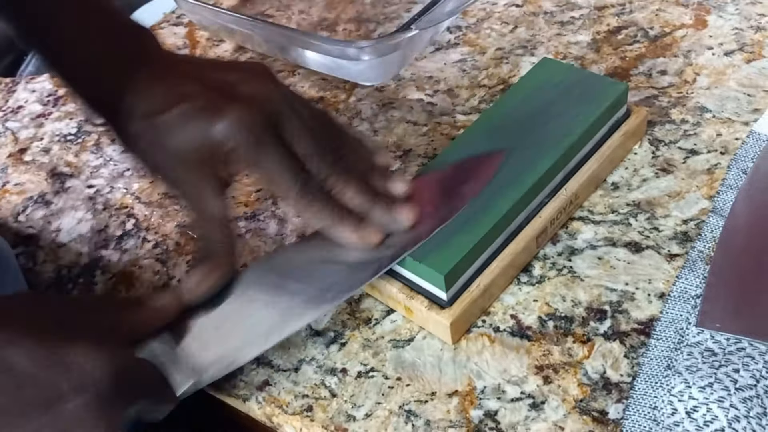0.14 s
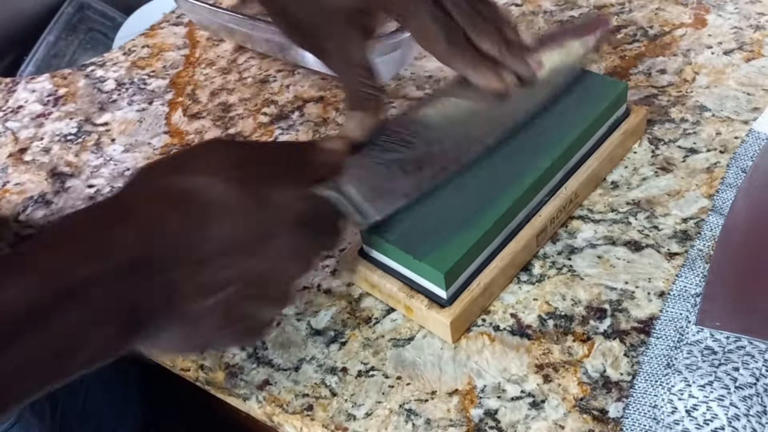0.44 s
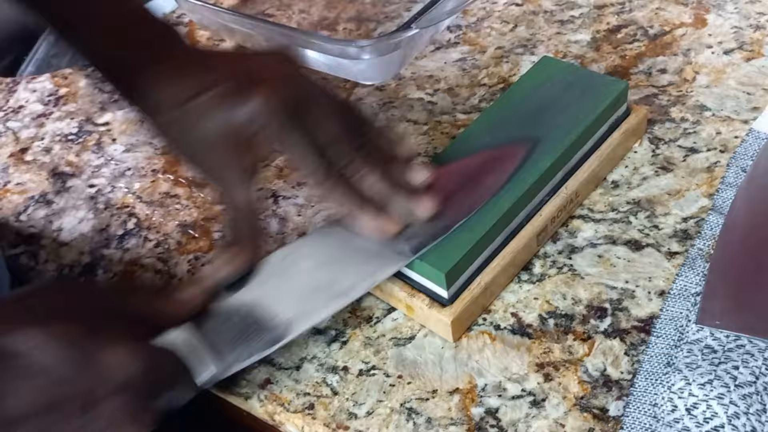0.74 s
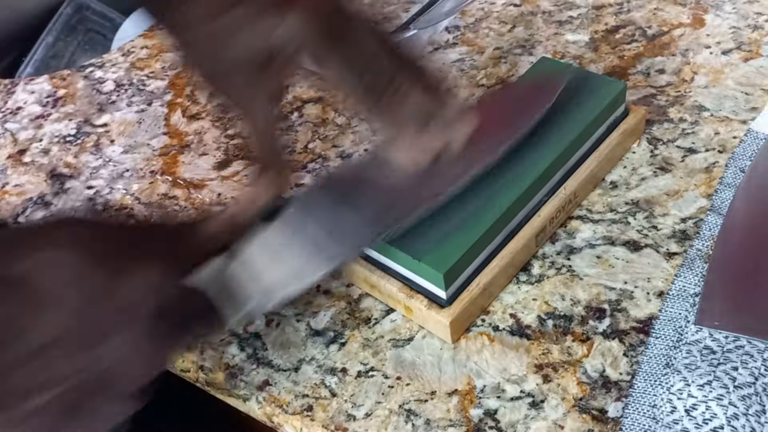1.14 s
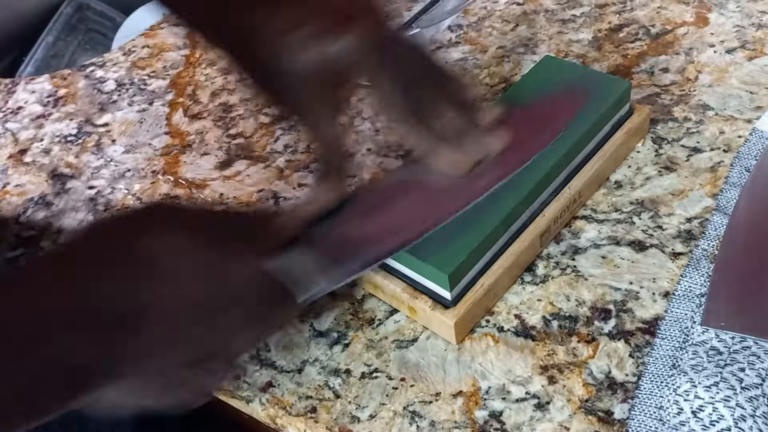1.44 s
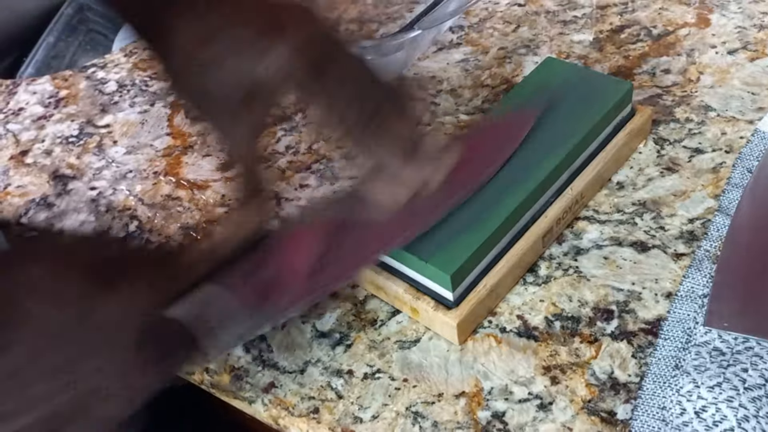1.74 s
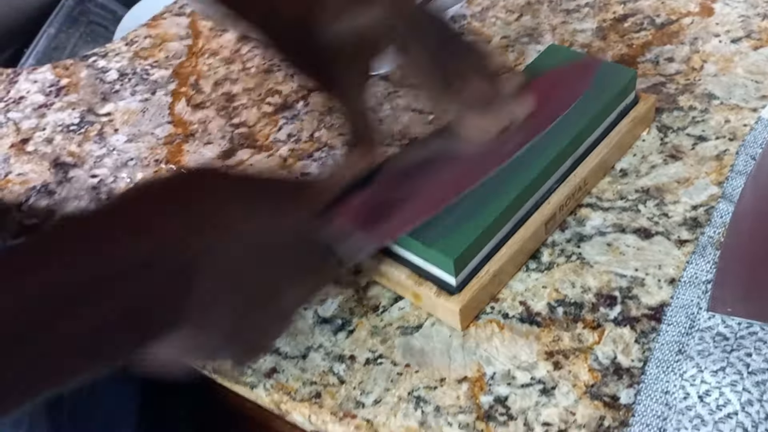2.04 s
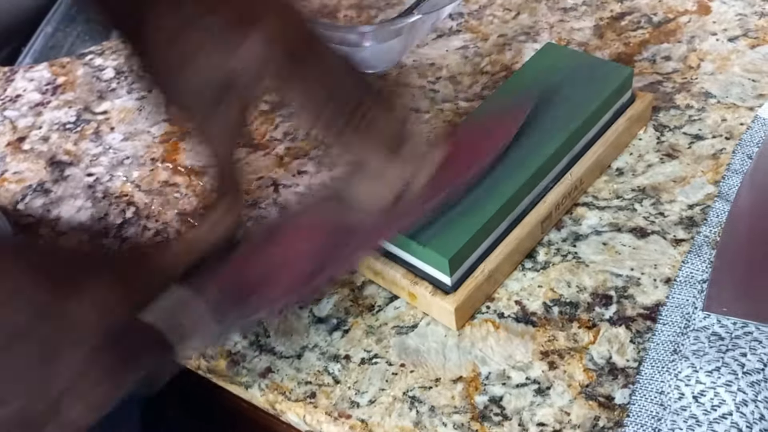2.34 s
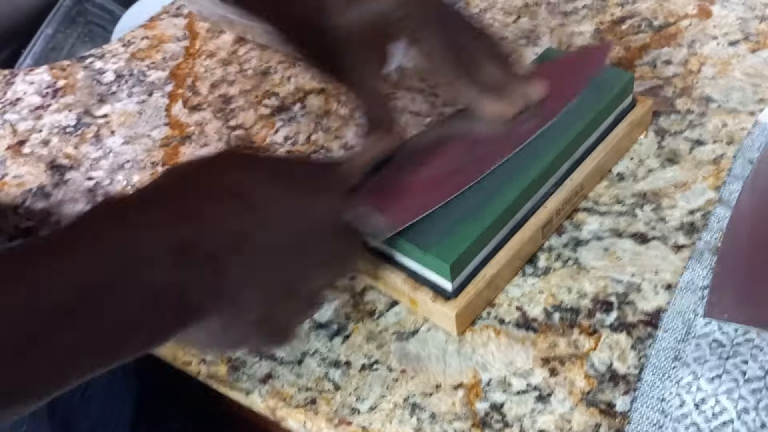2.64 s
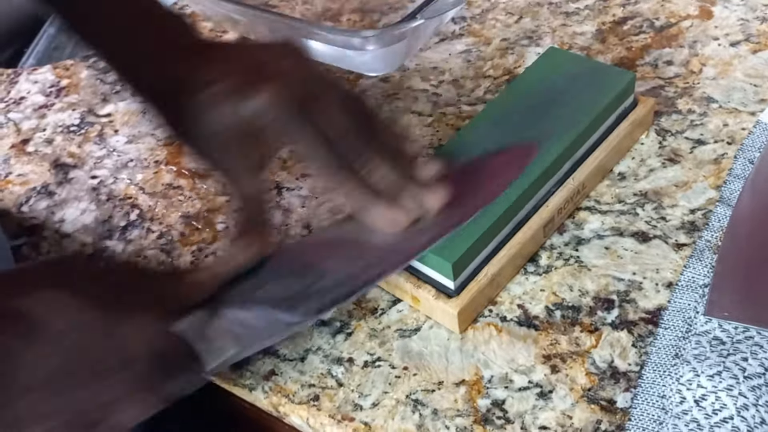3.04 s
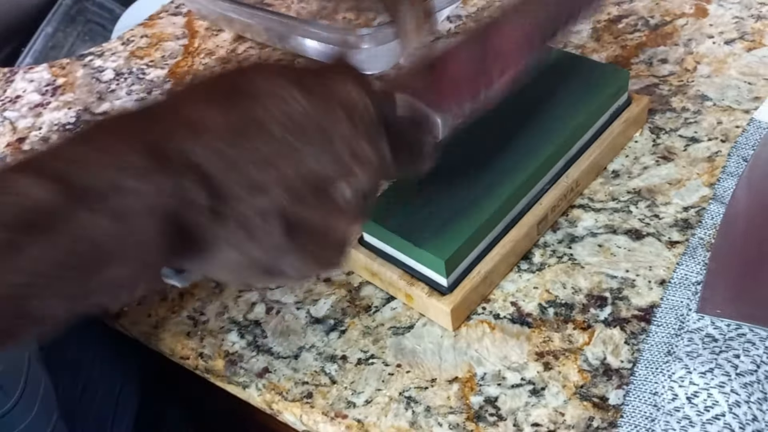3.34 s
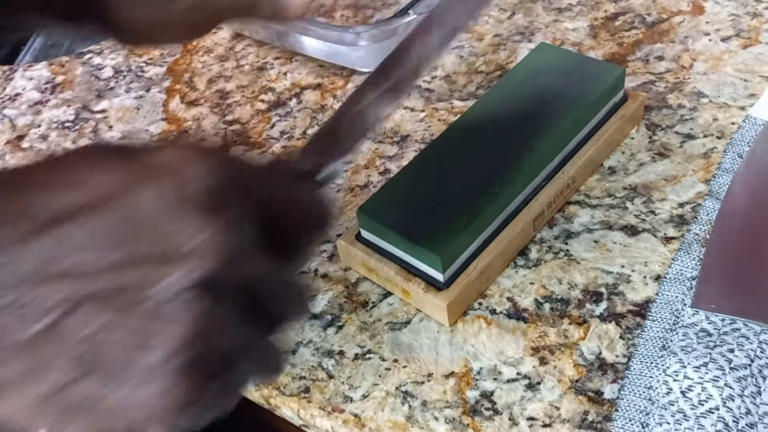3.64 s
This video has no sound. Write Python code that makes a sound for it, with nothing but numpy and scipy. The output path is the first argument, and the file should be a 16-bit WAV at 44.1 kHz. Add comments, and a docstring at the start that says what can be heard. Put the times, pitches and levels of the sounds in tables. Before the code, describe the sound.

Six brisk knife strokes on a sharpening stone, clinking at contact and scraping brightly, with small chirps in the fourth and fifth and faint blade ringing after later ones, recorded close in a kitchen.

```python
"""A kitchen knife is drawn six times along a whetstone over a low appliance drone and a faint hiss.
Each stroke starts with a clink, blade modes and a noise crack; then random grains scrape the edge, driving hiss,
blade body and a sliding resonance. Chirping tones mark catches of the edge in strokes four and five.
At the end of strokes the edge may rasp as it slips off and ring free as decaying sines.
A small hard kitchen answers every knife sound with a short noise tail."""
import sys
import numpy as np
from scipy import signal
from scipy.fft import rfft, irfft, next_fast_len
from scipy.io import wavfile
from scipy.ndimage import uniform_filter1d, map_coordinates

SR = 44100
rng = np.random.default_rng(int(sys.argv[2]) if len(sys.argv) > 2 else 0)


def to_wav(sig):
    """Store sig (one row per channel, or 1-D mono) as 16-bit WAV at the path in sys.argv[1].

    Samples outside -1..1 are clipped; the rate is SR.
    """
    pcm = np.clip(np.atleast_2d(sig), -1, 1) * 32767
    pcm = np.round(pcm).astype(np.int16)
    wavfile.write(sys.argv[1], SR, pcm.T)  # frames by channels


def convert_level_to_amplitude(level_db):
    """Map a level in decibels to its linear amplitude factor."""
    exponent = np.asarray(level_db, float) / 20
    return 10 ** exponent


N = 167580
T = np.arange(N) / SR

# grit hiss, one list a stroke: t/s, level/dB
STROKES = [
    [(.105, -39), (.17, -41), (.345, -28.5), (.42, -33.5), (.45, -37.5)],
    [(.69, -48.5), (.83, -40.5), (.96, -27.5), (1.01, -31.5), (1.06, -47.5)],
    [(1.26, -36.5), (1.32, -41.5), (1.53, -27.5), (1.63, -46.5)],
    [(1.795, -38), (1.878, -44), (1.93, -31.5), (1.995, -30.5), (2.12, -31.5), (2.2, -50)],
    [(2.4, -42.5), (2.465, -47.5), (2.53, -29.5), (2.6, -32), (2.67, -26), (2.76, -53.5)],
    [(2.985, -48.5), (3.03, -43), (3.1, -29), (3.24, -27.5), (3.33, -49.5)],
]
# blade lands: t/s, relative level/dB, contact (0 near the tip, 1 mid blade)
LANDINGS = [(.102, -14.5, 0), (.684, -13.5, 0), (1.254, -19, 0), (1.79, -23, 1), (2.397, -18.5, 1),
            (2.978, -17.5, 1)]
# modes of the held blade on the stone: f/Hz, relative level near the tip/dB, mid blade/dB
BLADE = [(404.4, -31, -16), (780, -11.5, -19), (1068, -13.5, -55.5), (1269, -33.5, -9.5),
         (1380, -6.5, -26.5), (1583, -6, -29), (1794, -28.5, -4), (2039, -2, -22.5), (3081, -28.5, -3),
         (3766, 3, -2.5), (4190, 2, -3), (4600, 4.5, -3.5), (5040, -3, -14), (6085, -14.5, -19)]

BODY_WIDTH_HZ = 320
CONTACT_S = 0.00066  # time constant of a blow's onset
DETUNE = [0.016, 0.003]  # relative pitch spread: near the tip, mid blade
CHIRP_S, CHIRP_SAG = 0.011, 0.05  # time scale; share of pitch lost per time scale


def unit(x):
    """Scale to an rms of 1."""
    return x / np.sqrt(np.mean(x ** 2) + 1e-20)


def along(points, hz):
    """Interpolate (f/Hz, value) points on a log frequency axis."""
    f, v = np.transpose(points)
    return np.interp(np.log(hz + 1), np.log(f + 1), v)


def wobble(knots_per_s):
    """Smooth random curve through normally distributed knots."""
    knots = rng.standard_normal(int(N * knots_per_s / SR) + 4)
    return map_coordinates(knots, [T * knots_per_s])


def filtered(x, response):
    """Multiply the spectrum by a complex response of frequency."""
    m = next_fast_len(N + SR // 2)
    return irfft(rfft(x, m) * response(np.fft.rfftfreq(m, 1 / SR)), m)[..., :N]


def rings(rows):
    """Response of causal resonances, rows of f/Hz, width/Hz, level/dB; signs alternate."""
    def response(f):
        return sum((-1) ** k * convert_level_to_amplitude(db) * 1j * f * width / (c * c - f * f + 1j * f * width)
                   for k, (c, width, db) in enumerate(rows))
    return response


def spread(x, other):
    """Two ports: a shared sound plus and minus an unrelated share."""
    # side over mid in noises: f/Hz, amplitude ratio
    unlike = [(200, 0.19), (5000, 1)]
    side = filtered(other, lambda hz: np.clip(along(unlike, hz), 0, 1))
    return np.array([x + side, x - side])


def add(x, s, sound):
    """Mix a short sound in at s seconds, cut at the end."""
    part = x[:, round(s * SR):][:, :sound.shape[-1]]
    part += sound[..., :part.shape[1]]


def scrape():
    """Grit drives the hiss, the blade body, its low modes and the sliding resonance; the edge catches."""
    # slope of the hiss: f/Hz, relative level/dB
    hiss_slope = [(3000, -40.5), (5000, -8.5), (9000, -9.5), (12300, -0.5), (16000, -6.5)]
    # peak added to the slope: f/Hz, width/Hz, level against the slope/dB
    hiss_rings = [(7460, 330, 3)]
    # a row a stroke: blade body over hiss/dB, low modes over hiss at the stroke's top/dB
    grip = [(-14.5, -24), (-16, -26.5), (-12, -31), (-13.5, -29.5), (-14, -29.5), (-12.5, -34)]
    slide_db = [-16, -10]  # over the hiss: near the tip, mid blade
    low_follows = 0.31  # dB the low modes fall per dB of hiss, over the hiss's first 20 dB

    low = [(hz, BODY_WIDTH_HZ / 2, max(tip, mid)) for hz, tip, mid in BLADE[1:8]]
    high = [(hz, BODY_WIDTH_HZ, mid / 2) for hz, tip, mid in BLADE[7:]]
    hiss = filtered(grit(), lambda f: convert_level_to_amplitude(along(hiss_slope, f)) * (1 + np.abs(rings(hiss_rings)(f))))
    layers = [hiss, filtered(grit(), rings(high)), filtered(grit(), rings(low)), grit(sliding)]

    gains = np.zeros((4, N))
    for rows, (body_db, low_db), (*_, place) in zip(STROKES, grip, LANDINGS):
        db = stroke_db(rows)
        top = np.max(np.array(rows)[:, 1])
        low_db = low_db - (1 - low_follows) * np.maximum(db - top, -20)
        gains += convert_level_to_amplitude(np.array([db, db + body_db, db + low_db, db + slide_db[place]]))
    mix = sum(g * spread(*unit(x)) for g, x in zip(gains, layers))
    flutter = convert_level_to_amplitude(0.77 * wobble(40))
    return flutter * mix + spread(catches(gains[0]), catches(gains[0]))


def stroke_db(rows):
    """Hiss level of one stroke in dB, with short ramps at its ends and -300 outside."""
    s, db = np.transpose(rows)
    return np.interp(T, [s[0] - .004, *s, s[-1] + .03], [-99, *db, -99], -300, -300)


def grit(shape=lambda hz, s: 1):
    """Dense abrasive grains of random size and sign, with drifting patches of colour."""
    grains_per_s, patchy_db = 9000, 4.5
    hits = rng.random((2, N)) < grains_per_s / SR
    hz, s, z = signal.stft(hits * rng.standard_normal((2, N)), SR, nperseg=256)
    field = uniform_filter1d(rng.standard_normal(z.shape[1:]), size=2, axis=0)
    field = uniform_filter1d(field, size=9, axis=1)
    z = z * convert_level_to_amplitude(patchy_db * unit(field)) * shape(hz[:, None] + 1, s)
    return signal.istft(z, nperseg=256)[1][:, :N]


def sliding(hz, t):
    """Resonances as contact runs along the edge: tip strokes fall, mid-blade strokes fall and climb back."""
    # ridges that move together: frequency ratio to the centre
    ratios = [.66, 1, 1.65]
    from_hz, to_hz, width_octaves = 4700, [1520, 2960], 0.084  # to_hz: near the tip, mid blade
    centre = np.full(len(t), float(from_hz))
    for rows, (*_, place) in zip(STROKES, LANDINGS):
        s = np.transpose(rows)[0]
        if place:
            travel = np.sin(np.pi * np.clip((t - s[1]) / (s[-2] - s[1]), 0, 1))
        else:
            travel = np.clip((t - s[0]) / (s[-1] - s[0]), 0, 1) * (t < s[-1])
        centre = centre * (to_hz[place] / from_hz) ** travel
    ridges = sum(np.exp(-(np.log2(hz / centre / k) / width_octaves) ** 2) for k in ratios)
    return ridges / np.sqrt(centre)


def catches(level):
    """Small catches of the edge: short sagging whistles, random in time and pitch, scaled by the hiss level."""
    per_s, catch_db, centre_hz = 380, -19.5, 3870
    draw = rng.random((int(per_s * N / SR), 4))
    u = np.linspace(-1, 1, round(2 * CHIRP_S * SR))
    hz = centre_hz * 2 ** (2 * draw[:, 1:2] - 1)  # an octave either way
    envelope = np.exp(-(3 * u / (.5 + draw[:, 2:3])) ** 2)
    tone = envelope * np.sin(2 * np.pi * hz * np.cumsum(1 - CHIRP_SAG * u) / SR)
    at = (draw[:, :1] * N).astype(int) + np.arange(len(u))
    size = np.log(draw[:, 3:])  # exponentially distributed
    return convert_level_to_amplitude(catch_db) * level * np.bincount(at.ravel(), (size * tone).ravel(), N)[:N]


def struck(modes, t, detune):
    """Decaying modes (f/Hz, level/dB, t60/s); levels, pitches and phases vary by blow, phases by port too."""
    out = 0
    for hz, db, t60 in modes:
        phase = 2 * np.pi * rng.random() + 0.8 * rng.standard_normal((2, 1))
        decay = convert_level_to_amplitude(db + rng.normal() - 60 * t / t60)
        out = out + decay * np.sin(2 * np.pi * hz * rng.normal(1, detune) * t + phase)
    return out


def landings():
    """The blade lands: modes ring, noisy chatter strikes them again, and a broad noise crack dies away."""
    # pairs: near the tip, mid blade
    t60_1khz_s, t60_slope = [0.079, .13], [-1.19, -.25]  # slope: exponent of frequency
    chatter_t60_s, chatter_db = [0.072, 0.0197], [-6.5, -24]
    crack_db, crack_t60_s, crack_hz, clink_db = [5.5, 3.5], 0.059, 3550, -11

    x, t = np.zeros((2, N)), np.arange(SR // 2) / SR
    rise = 1 - np.exp(-t / CONTACT_S)
    for s, db, place in LANDINGS:
        modes = [(hz, (tip, mid)[place], t60_1khz_s[place] * (hz / 1000) ** t60_slope[place])
                 for hz, tip, mid in BLADE]
        ring = struck(modes, t, DETUNE[place])
        chatter = convert_level_to_amplitude(chatter_db[place] - 60 * t / chatter_t60_s[place]) * rng.standard_normal(len(t))
        again = signal.fftconvolve(ring * rise, chatter[None], axes=1)[:, :len(t)]
        ring = ring + again / np.sqrt(SR / 1000)
        noise = spread(*rng.standard_normal((2, N)))
        crack = unit(filtered(noise, rings([(crack_hz, 2 * crack_hz, 0)])))[:, :len(t)]
        crack = crack * convert_level_to_amplitude(-60 * t / crack_t60_s)
        add(x, s, convert_level_to_amplitude(db + clink_db) * rise * (ring + convert_level_to_amplitude(crack_db[place]) * crack))
    return x


def chirps():
    """The edge catches and chirps: sagging sines under a bell envelope of uneven level."""
    # t/s, f/Hz, level/dB
    caught = [(1.927, 4350, -30), (2.116, 4700, -31), (2.492, 4200, -32), (2.502, 3600, -32),
              (2.668, 5150, -26)]
    x = np.zeros((2, N))
    for s, hz, db in caught:
        u = (T - s) / CHIRP_S
        phase = 2 * np.pi * hz * np.cumsum(1 - CHIRP_SAG * np.clip(u, -2, 2)) / SR
        x += convert_level_to_amplitude(db + 2.2 * wobble(400)) * np.exp(-4 * u ** 2) * np.sin(phase)
    return x


def lift_offs():
    """The edge slips off: a burst of resonant grit, then the freed blade rings in decaying modes."""
    # t/s, rasp level/dB, free ring level/dB
    lifts = [(0.431, -38, -82), (1.012, -39.5, -64), (1.61, -63, -61), (2.18, -53, -43.5),
             (3.291, -55, -40)]
    # free blade: f/Hz, relative level/dB, t60/s
    free_modes = [(1545, -14, .25), (12020, 0, .2), (14300, -4, .25)]
    # rasp resonances: f/Hz, relative level/dB
    rasp_modes = [(880, -7), (1220, -7), (1550, -1.5), (2040, 2)]
    rasp_s = 0.0073  # half length, to 1/e

    x, t = np.zeros((2, N)), np.arange(SR // 2) / SR
    rise = 1 - np.exp(-t / CONTACT_S)
    rasp = unit(filtered(grit(), rings([(hz, BODY_WIDTH_HZ / 2, db) for hz, db in rasp_modes])))
    for s, rasp_db, db in lifts:
        x += convert_level_to_amplitude(rasp_db) * np.exp(-((T - s) / rasp_s) ** 2) * spread(*rasp)
        add(x, s, convert_level_to_amplitude(db) * rise * struck(free_modes, t, DETUNE[1]))
    return x


def kitchen(x):
    """Room answer: 120 samples late, a noise tail in which each frequency dies at its own speed."""
    # f/Hz, t60/s
    decay = [(3000, 0.36), (15000, 0.23)]
    hz, t, z = signal.stft(rng.standard_normal((2, SR // 2)), SR, nperseg=256)
    tail = signal.istft(z * convert_level_to_amplitude(-60 * t / along(decay, hz)[:, None]), SR, nperseg=256)[1]
    tail = tail / np.linalg.norm(tail[0])
    return signal.fftconvolve(np.pad(x, (120, 0))[None], tail, axes=1)[:, :N]


def background():
    """Low noise drone with narrow hums, swelling under the pressing hands, and a faint steady hiss."""
    # drone slope: f/Hz, relative level/dB
    drone_slope = [(25, -41.5), (100, -13), (250, -6), (480, -17), (1200, -44.5)]
    # hums added to the slope: f/Hz, width/Hz, level against the slope/dB
    hums = [(275.6, 2.2, 10.5), (423.3, 2.2, 15.5)]
    # faint hiss: f/Hz, relative level/dB
    air_slope = [(600, -24.5), (1700, -9.5), (3600, -17), (3830, 0), (4500, -11.5), (6000, -25),
                 (16000, -37.5)]
    drone_db, press_db, fade_db, air_db = -59, 6, -1.5, -77.5

    pressing = uniform_filter1d(sum(1. * (stroke_db(rows) > -60) for rows in STROKES), size=5000)
    fade = np.clip(T - 1.55, 0, 1)  # over 1 s from 1.55 s
    db = drone_db + press_db * pressing + fade_db * fade + wobble(6.7)
    drone = unit(filtered(rng.standard_normal((2, N)),
                          lambda f: convert_level_to_amplitude(along(drone_slope, f)) * (1 + np.abs(rings(hums)(f)))))
    air = unit(filtered(rng.standard_normal((2, N)), lambda f: convert_level_to_amplitude(along(air_slope, f))))
    return convert_level_to_amplitude(db) * spread(*drone) + convert_level_to_amplitude(air_db) * spread(*air)


def scene():
    """Knife with a level and time offset between the ports, its room answer, and the background."""
    # f/Hz, left over right/dB
    port_tilt = [(500, 13), (1200, -7), (5000, 0)]
    port_lag_s, room_db = -0.000026, -6  # lag of left behind right: left leads
    knife = scrape() + landings() + chirps() + lift_offs()
    side = np.array([[.5], [-.5]])
    ports = filtered(knife, lambda f: convert_level_to_amplitude(side * along(port_tilt, f))
                     * np.exp(-2j * np.pi * f * side * port_lag_s))
    return ports + convert_level_to_amplitude(room_db) * kitchen(knife.mean(0)) + background()


def band_limit(x):
    """A steep low-pass at the top of the band."""
    return signal.sosfilt(signal.butter(12, 16970, fs=SR, output="sos"), x)


def record(dry):
    """A steep step down at 15.9 kHz to a floor of -32 dB finishes the mix."""
    mix = filtered(dry, lambda hz: convert_level_to_amplitude(-32) + 1 / (1 + (hz / 15900) ** 400))
    return band_limit(mix)


dry = scene()
out = record(dry)
to_wav(out)
```